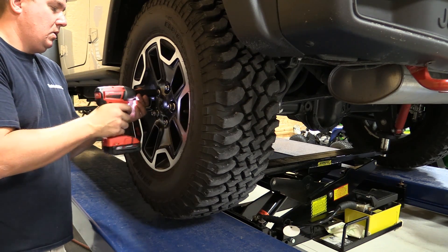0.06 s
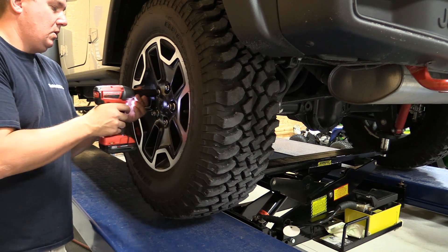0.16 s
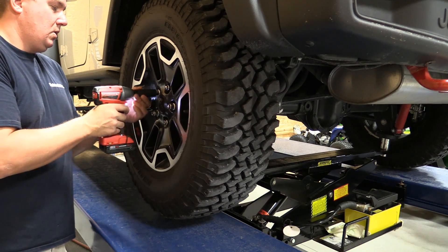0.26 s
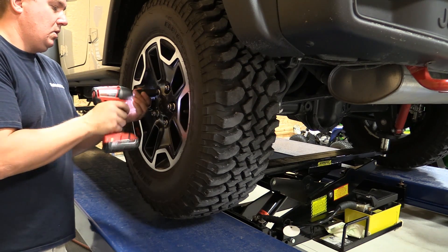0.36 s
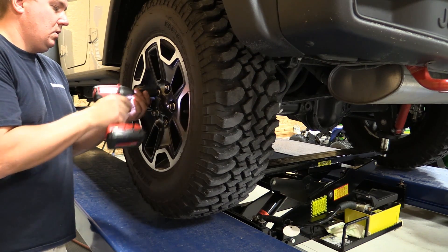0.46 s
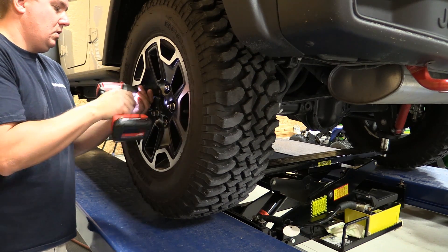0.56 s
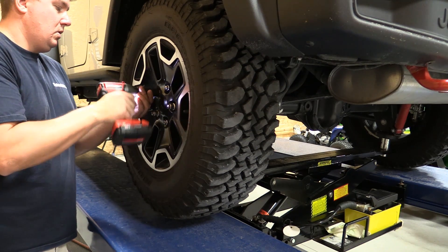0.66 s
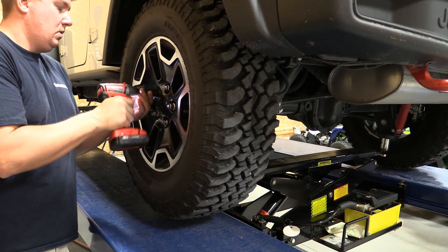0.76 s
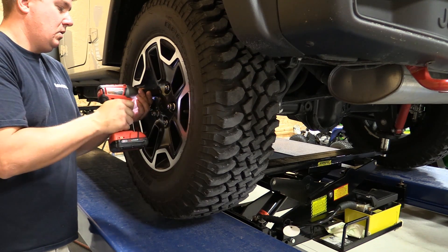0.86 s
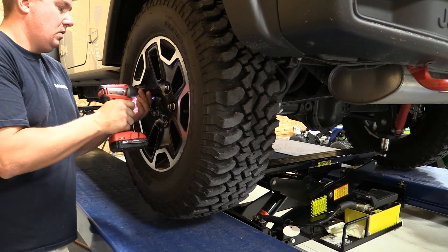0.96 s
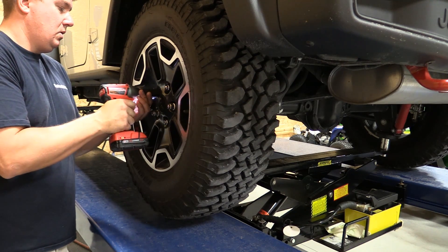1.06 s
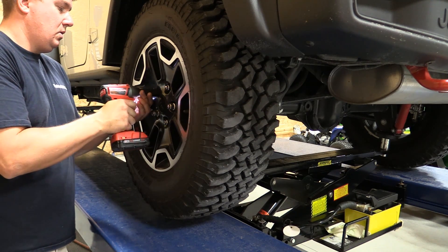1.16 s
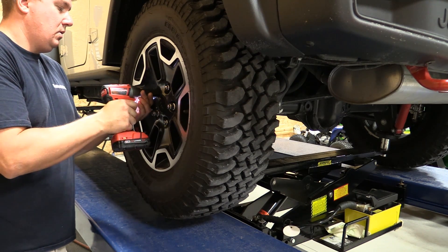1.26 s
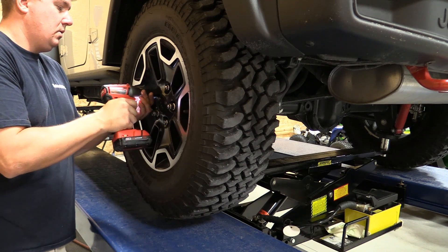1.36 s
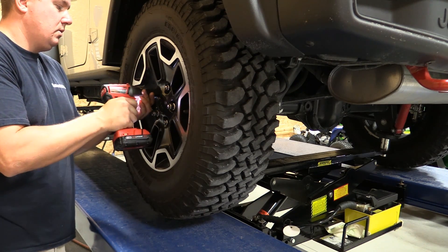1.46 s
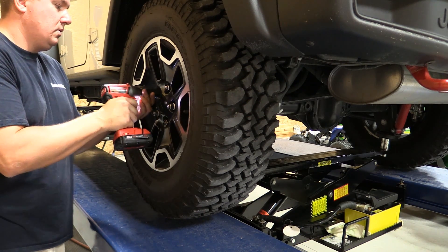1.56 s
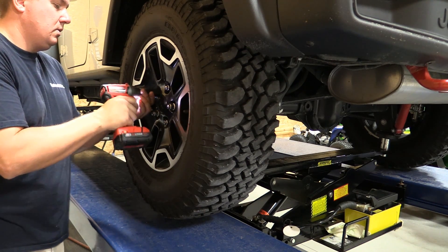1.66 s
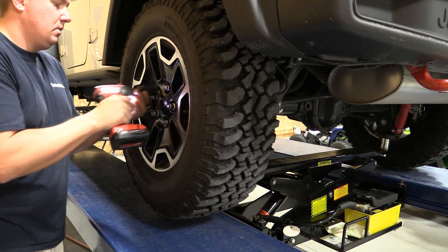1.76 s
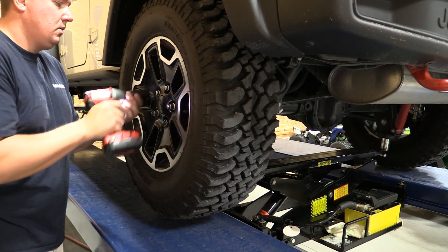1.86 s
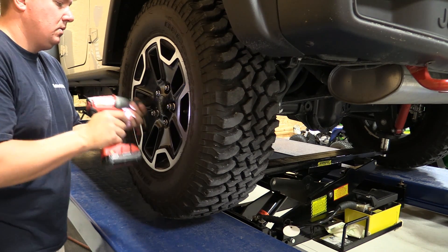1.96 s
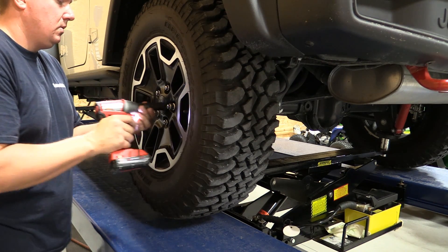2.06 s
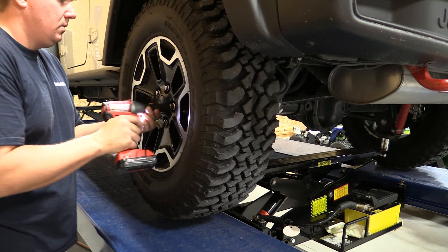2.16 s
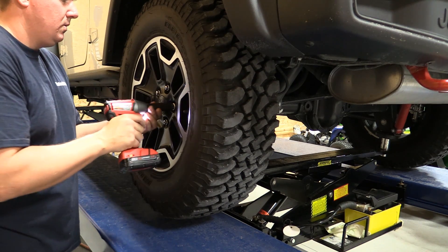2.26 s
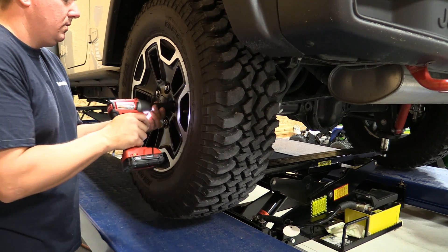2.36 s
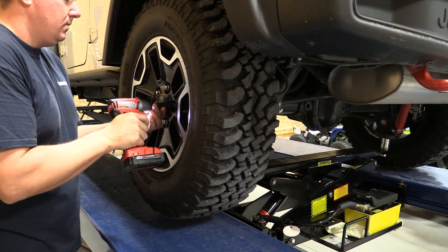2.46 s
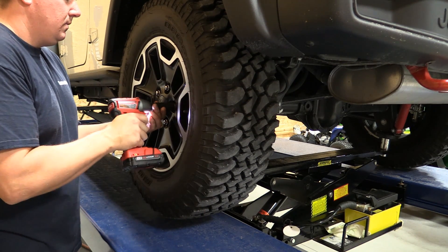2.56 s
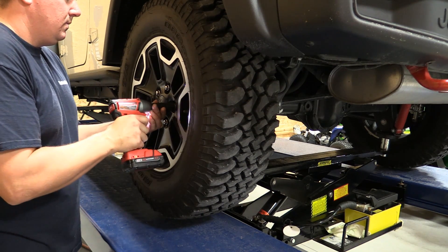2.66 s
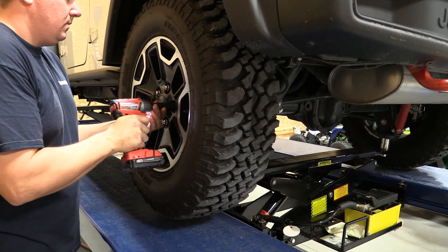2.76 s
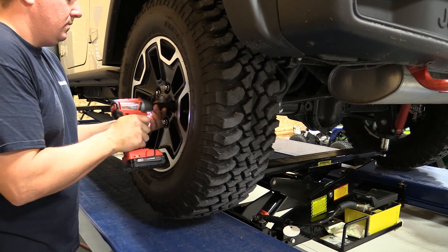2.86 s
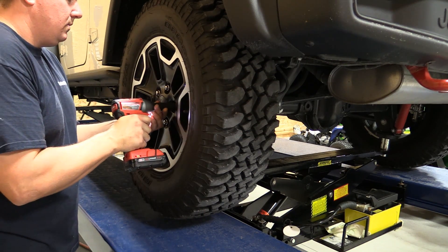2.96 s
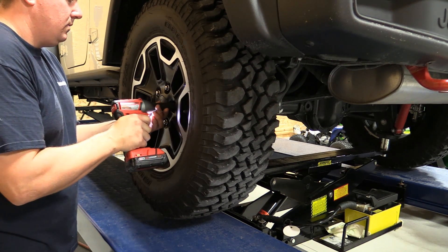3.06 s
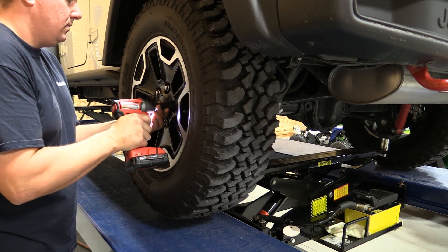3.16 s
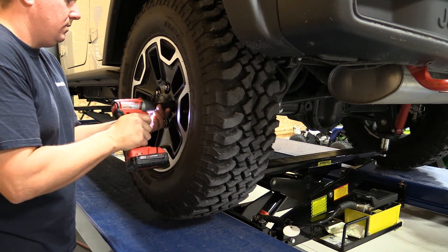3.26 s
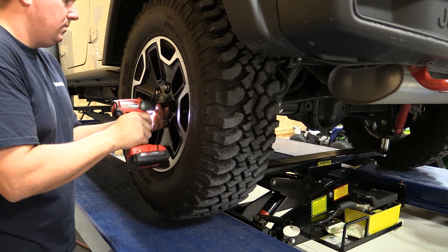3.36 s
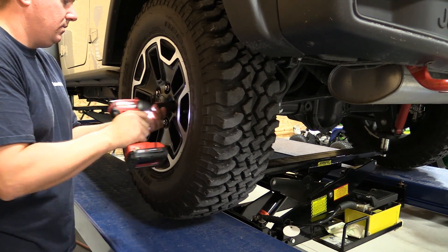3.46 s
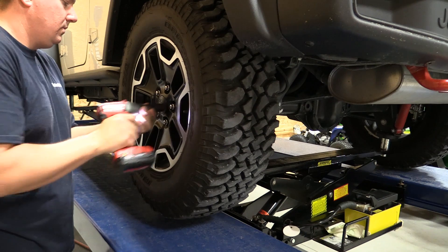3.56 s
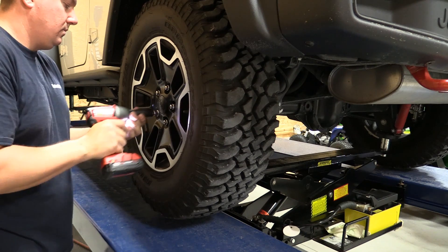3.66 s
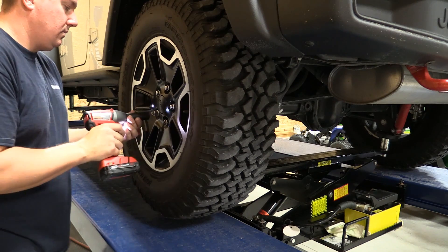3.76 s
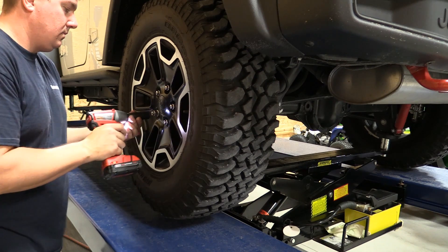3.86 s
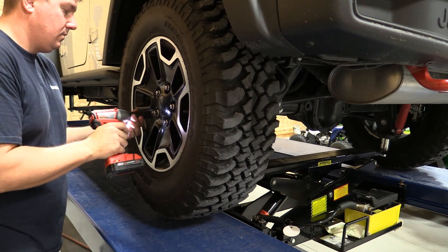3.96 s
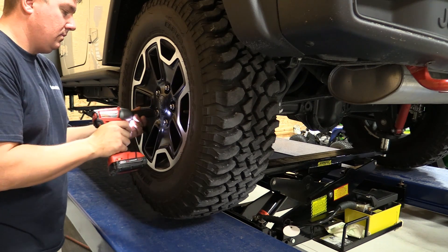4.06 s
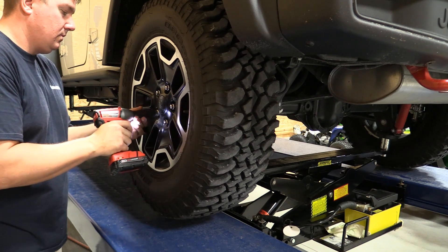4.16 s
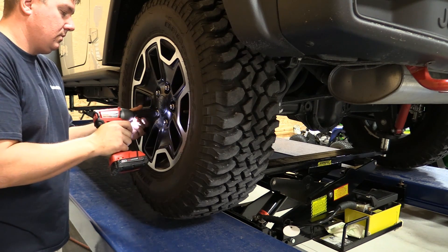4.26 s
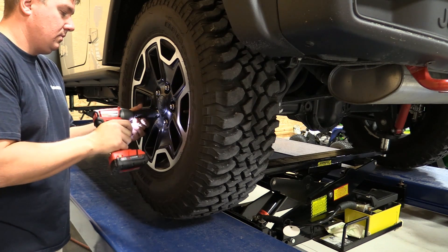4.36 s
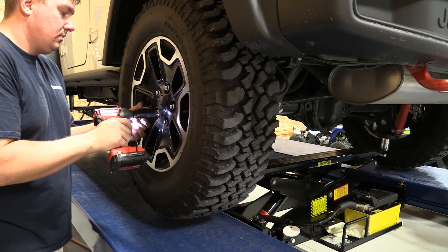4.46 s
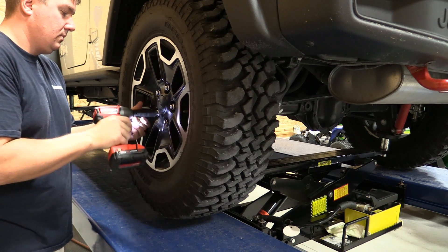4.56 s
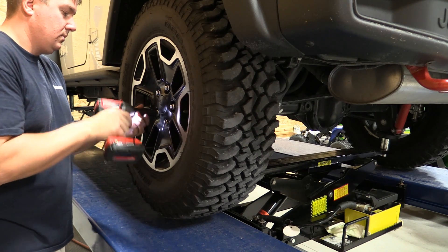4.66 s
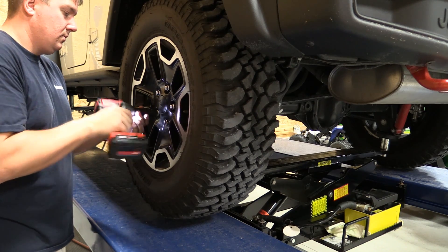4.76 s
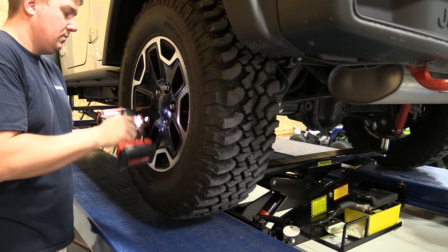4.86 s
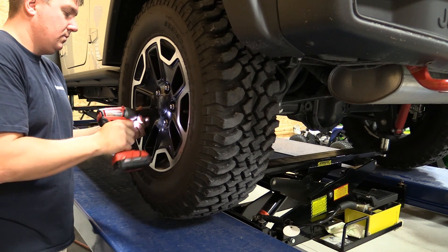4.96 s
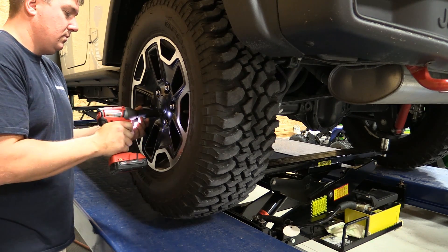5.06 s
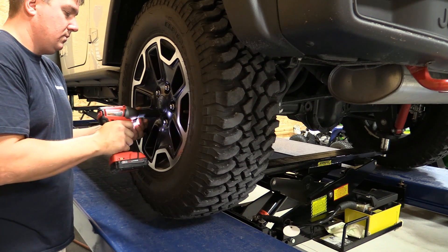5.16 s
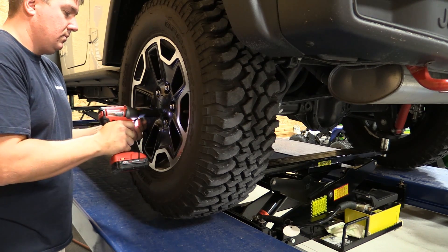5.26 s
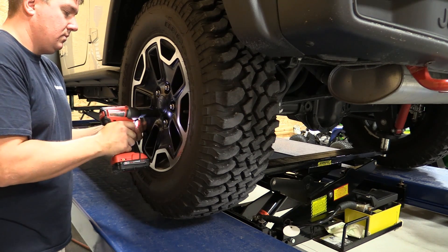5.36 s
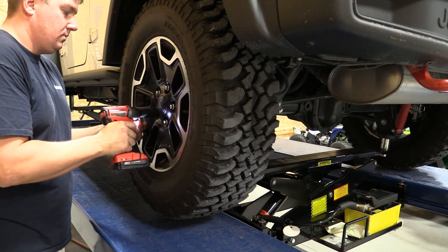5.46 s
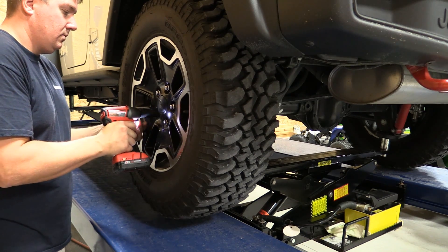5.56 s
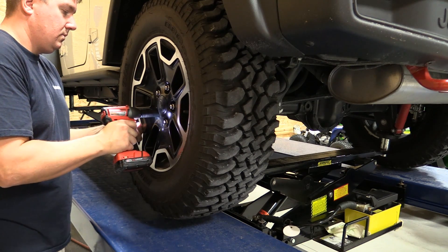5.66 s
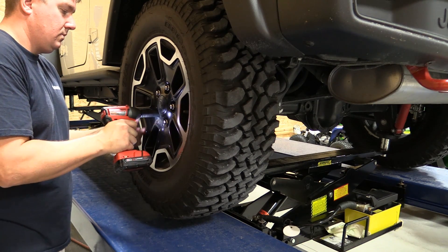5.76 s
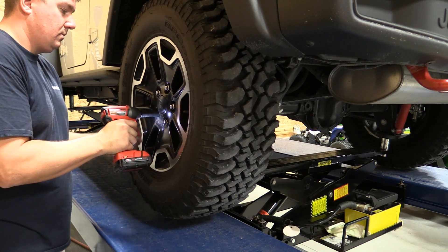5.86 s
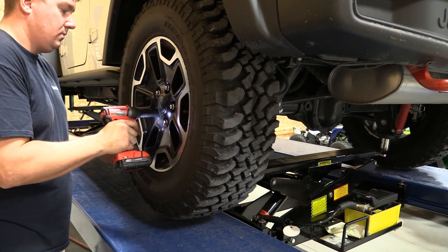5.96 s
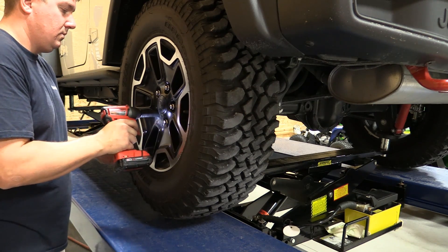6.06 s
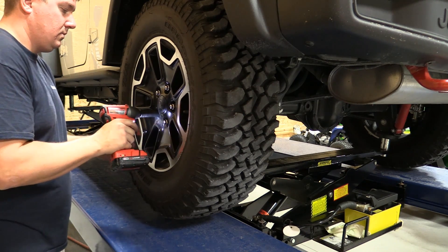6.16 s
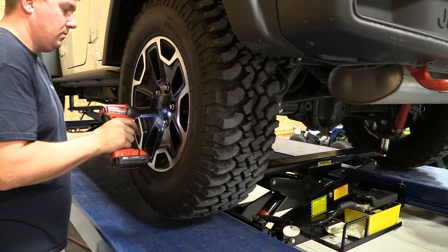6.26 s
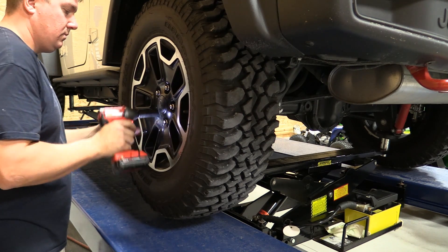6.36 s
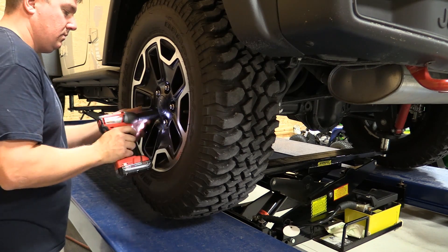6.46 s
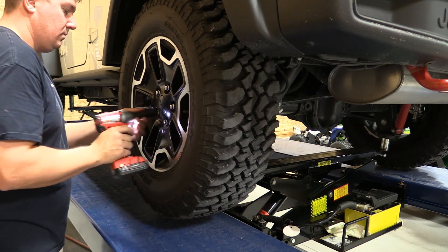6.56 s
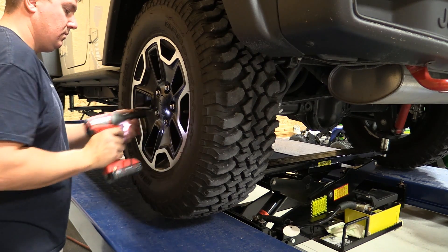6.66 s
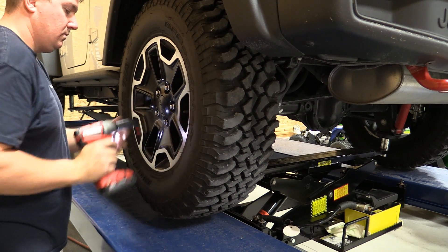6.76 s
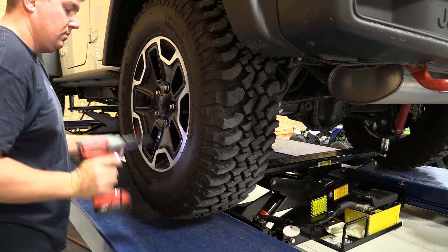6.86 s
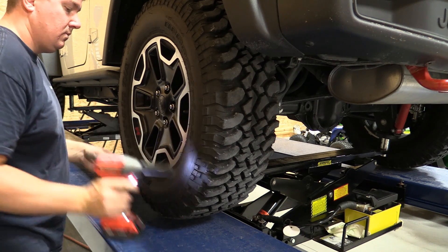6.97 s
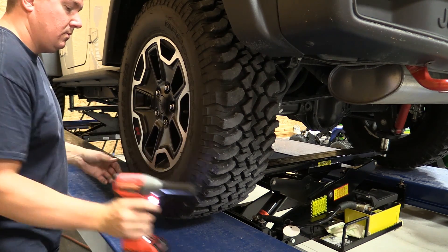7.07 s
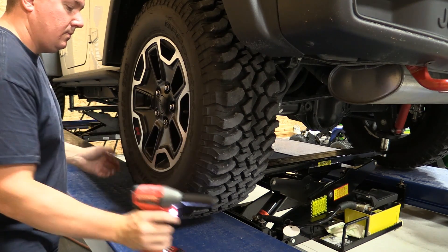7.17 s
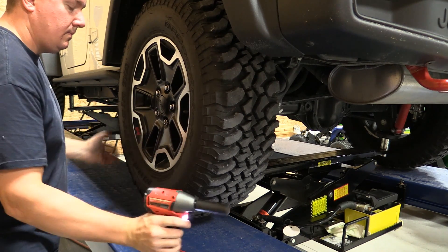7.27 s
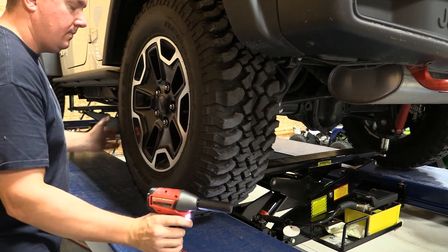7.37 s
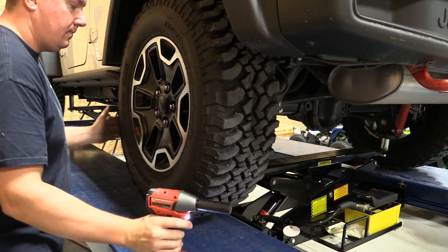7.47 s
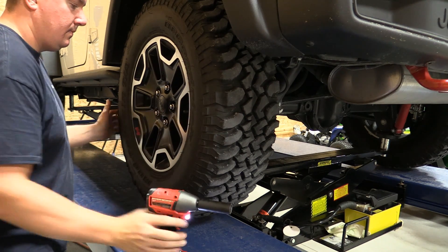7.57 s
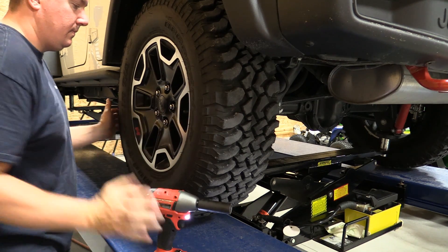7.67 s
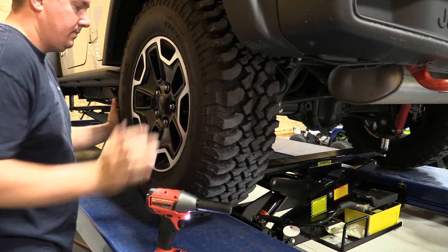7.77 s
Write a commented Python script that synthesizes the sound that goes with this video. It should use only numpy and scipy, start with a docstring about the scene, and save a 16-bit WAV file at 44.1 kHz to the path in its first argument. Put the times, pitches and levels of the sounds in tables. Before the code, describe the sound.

In a large, echoing garage, a cordless impact wrench tightens three lug nuts on a wheel. Each time the gears whirr and the loose socket rattles, then the tool breaks into a short, loud burst of rapid hammering. The socket clinks from nut to nut in the pauses. Finally the tool is set down on a steel lift with a clack and a soft boom, over a faint machinery hum.

```python
"""A large, echoing garage: a cordless impact wrench runs three lug nuts onto an alloy wheel.
On each nut the gears whirr and the socket rattles until it seats; then the hammer strikes about
40 times a second. The socket clinks from nut to nut; last, the tool lands on the booming steel lift.
Air, machinery hum and handling rub lie underneath. Gain control ducks the loud parts."""
import sys
import numpy as np
from scipy import signal
from scipy.io import wavfile

SR = 44100
rng = np.random.default_rng(int(sys.argv[2]) if len(sys.argv) > 2 else 0)


def pcm_store(signal):
    """Save signal as 16-bit PCM."""
    levels = np.round(np.clip(np.atleast_2d(signal), -1, 1) * 32767)
    wavfile.write(sys.argv[1], SR, levels.astype(np.int16).T)


N = 345303
TIME_S = np.arange(N) / SR
BLOW_RATE_HZ = 40.26  # two blows per hammer turn
TOUCH_LEAD_S = .006  # nut meets wheel this long before the first blow

# Noise spectra. Each row: frequency in Hz, relative density in dB.
AIR_SPECTRUM = [(25, 0), (45, 10.5), (100, 5.5), (200, -9.5), (350, 0.5), (550, -4), (1000, -20.5),
                (2000, -17.5), (4000, -22.5), (6500, -27.5), (9000, -28), (10700, -22), (12000, -29.5),
                (15500, -36.5)]
OLD_ECHO_SPECTRUM = [(100, -6), (550, 4.5), (850, -1.5), (1500, -3.5), (2800, 2.5), (4700, 0.5), (5300, -9),
                     (6200, -16), (12000, -28)]
GEAR_SPECTRUM = [(50, -27), (200, -1), (400, -4), (600, -2.5), (1500, 1.5), (1900, -2.5), (3400, 3.5),
                 (4600, -0.5), (7400, -10), (9000, -8.5), (11300, -26), (14000, -27), (15000, -34.5)]
SOCKET_SPECTRUM = [(60, -6.5), (230, 2), (450, -3), (900, -0.5), (1900, -2), (3200, 3), (5200, -3.5),
                   (6500, -11.5), (8500, -14.5), (11000, -28), (15500, -31)]
ANVIL_SPECTRUM = [(50, -37), (160, -28), (270, -15), (410, -14), (1000, -12), (1750, -10.5), (2300, -6),
                  (3300, 4), (4500, -2.5), (6500, -7.5), (8600, -12), (10200, -22.5), (12500, -25),
                  (14100, -24.5), (15200, -32.5)]
RUB_SPECTRUM = [(40, -16.5), (110, -5.5), (190, -2.5), (350, -11.5), (700, -21.5), (3000, -48),
                (10000, -48)]
TAIL_SPECTRUM = [(100, -15), (500, 2.5), (1500, -1.5), (3500, -2), (8000, -2.5), (14000, 10)]
BATTERY_SPECTRUM = [(60, -16), (300, 8), (800, -2.5), (1400, 1.5), (2000, -1), (4200, -1.5),
                    (6000, -11), (9500, -14.5), (12500, -34), (15500, -34)]
SHUDDER_SPECTRUM = [(25, -13), (70, 5), (300, -3), (600, -16), (1500, -35), (5000, -47)]
# Modes of lift deck, socket with rim, and wheel body. Each row: frequency in Hz, level in dB,
# T60 in seconds.
DECK_MODES = [(67.8, 10, 0.54), (73, -3, 0.87), (93.5, 6, 0.483), (136.2, -3, 1), (186, -15, 0.8),
              (258, -1, 0.69), (275, -20, .9), (336, -1, 1), (418, -10, 1), (514, -6, 0.34), (576, -10, .6),
              (660, -12, 0.72)]
RIM_MODES = [(290, -8, .2), (555, -8, .25), (1240, -3, .11), (1390, -9, .12), (2050, -7, .08),
             (2550, 1, .09), (3500, -4, .05), (4450, -2, .11), (4660, 0, .06), (5220, 2, .04),
             (7200, -10, .03), (8500, -10, .025), (15250, -24, .04)]
WHEEL_MODES = [(245, -41.5, 0.12), (275, -34.5, .032), (319.7, -48, 0.32), (555, -57.5, .6)]
# Shop machinery. Each row: frequency in Hz, level in dB, width in Hz.
HUM_TONES = [(80, -57.5, 10), (104.2, -62, 20), (114.6, -53.5, 7.4)]
# Arms shift the tool. Each row: middle in seconds, length in seconds, level in dB.
ARM_MOVES = [(0.553, 0.79, -53), (2.4, 0.35, -48.5), (4.25, .5, -53.5), (4.958, 0.42, -49.5),
             (6.896, 0.63, -70), (7.7, .7, -59)]
# Hall decay. Each row: frequency in Hz, T60 in seconds.
HALL_T60 = [(100, 0.29), (400, 2.1), (1000, 2.38), (3000, 1.97), (5000, 1.72), (8000, 1.23), (14000, 0.58)]
# Tool lands on the lift and rocks. Each row: start in seconds, clack in dB, boom in dB.
TOOL_LANDINGS = [(7.298, -19.5, -34.5), (7.322, -25, -43), (7.395, -27.5, -41)]
# Socket pulled off and pushed on. Each row: start in seconds, scrape level in dB, tilt in dB per octave,
# scrape decay in seconds, rim ring in dB.
SOCKET_CLINKS = [(0.251, -36, -5.5, .003, -43), (0.385, -30, -11, .003, -41), (0.458, -35, -8, 0.0094, -38),
                 (.553, -34, -4.5, 0.012, -36), (0.615, -31.5, -6.5, 0.037, -43.5),
                 (0.655, -31.5, 0, .004, -38), (.753, -38.5, -3.5, .003, -46.5),
                 (.837, -27, -1, 0.0014, -42.5), (2.257, -18.5, -2.5, 0.0034, -44),
                 (2.318, -26, -2.5, 0.0066, -30), (2.444, -36.5, -0.5, 0.004, -29),
                 (2.625, -28.5, -0.5, 0.0024, -38.5), (4.141, -24.5, 1.5, .006, -12),
                 (4.195, -16, -1.5, 0.0084, -19), (4.473, -38.5, -0.5, .005, -37.5),
                 (4.683, -25, -1, 0.00078, -24), (4.704, -26, 2, .012, -30),
                 (4.786, -34.5, 2.5, .002, -39.5), (4.86, -32.5, -1.5, 0.0036, -31.5),
                 (4.904, -16.5, -2.5, 0.0055, -22.5), (5.082, -29.5, -2, 0.0026, -35.5),
                 (6.82, -27, -1, 0.0013, -47)]
# Hard knocks of the loose socket. Each row: start in seconds, level in dB.
SOCKET_KNOCKS = [(0.909, -18), (0.9191, 0.6), (0.9235, -2), (0.938, -6), (1.0457, -11), (1.2011, -8.5),
                 (1.2377, -10), (1.3245, -10.5), (1.754, -11), (2.6871, -19), (2.698, 0), (2.707, -6),
                 (2.7163, -4.5), (2.895, -9.5), (2.9857, -9), (3.0283, -8.5), (3.0427, -4), (3.4945, -8),
                 (3.5084, -15), (5.1486, -12.5), (5.4975, -16), (6.031, -10.5)]
# Timing per nut. Each row: trigger pull, seating and trigger release, all in seconds.
NUT_RUNS = [(.86, 1.396, 1.755), (2.655, 3.104, 3.47), (5.11, 5.649, 6.015)]
# Drive per nut. Each row: free speed in Hz, spin-up in seconds, gear level in dB, run-down swell in dB,
# gear level while hammering in dB.
NUT_DRIVES = [(38.16, 0.025, -27.5, 6, -28), (37.77, .023, -30.5, 9, -33.5),
              (38.65, .034, -25, -1.5, -35.5)]
# Tool-to-wheel coupling per nut. Each row: blow level in dB, blow fade in dB per second, mesh in dB,
# whine in dB, rumble in dB, seating ring in Hz.
NUT_COUPLINGS = [(-6.5, 3, -16, -2.5, -16, 2200), (-2.5, 19, -15, -4.5, -16.5, 1800),
                 (-8.5, 5, -8, -5.5, -13.5, 2150)]
# Gear mesh. Each row: multiple of drive speed, level in dB.
MESH_ORDERS = [(36, -7), (38, -11), (42, 0)]
# Wheel shake. Each row: multiple of drive speed, level in dB, width in Hz.
RUMBLE_ORDERS = [(2, -3, 10), (3, -15, 20), (4.701, 2, 66), (6, -1.5, 30)]


def gain_of(db):
    """Decibels to amplitude."""
    return 10 ** (np.asarray(db) / 20)


def unit_rms(x):
    """Scales to rms 1."""
    return x / np.sqrt(np.mean(x ** 2) + 1e-20)


def log_interp(table, hz):
    """Reads a table on a log-frequency axis."""
    table_hz, values = np.transpose(table)
    return np.interp(np.log(hz + 1), np.log(table_hz + 1), values)


def add(mix, start_s, sound):
    """Mixes a sound in at start_s."""
    part = mix[round(start_s * SR):][:len(sound)]
    part += sound[:len(part)]


def coloured(x, spectrum, tilt_db_oct=0, size=2048):
    """Minimum-phase filter of unit energy; the tilt sets in around 500 Hz."""
    hz = abs(np.fft.fftfreq(size, 1 / SR))
    log_gain = np.log(gain_of(log_interp(spectrum, hz) + tilt_db_oct * np.log2(1 + hz / 500)))
    impulse = np.fft.ifft(np.exp(np.conj(signal.hilbert(log_gain)))).real
    return signal.oaconvolve(x, impulse / np.linalg.norm(impulse))[:len(x)]


def fuzzy_tone(hz, width_hz, steadiness=.26):
    """Tone along the curve hz, wandering in phase and, less so, in strength."""
    offset_hz = np.fft.fftfreq(2 ** int(np.ceil(np.log2(len(hz)))), 1 / SR)
    phasors = np.exp(2j * np.pi * rng.random(len(offset_hz)))
    wander = np.fft.ifft(phasors / (1 + (2 * offset_hz / width_hz) ** 2))[:len(hz)]
    carrier = np.exp(2j * np.pi * np.cumsum(hz) / SR)
    return unit_rms((wander / abs(wander) ** steadiness * carrier).real)


def ringing(modes, spread_db):
    """One second of decaying modes; each contact shares its energy out differently."""
    t = np.arange(SR) / SR
    out = np.zeros(SR)
    for hz, db, t60_s in modes:
        envelope = gain_of(db + spread_db * rng.standard_normal() - 60 * t / t60_s)
        out += envelope * np.sin(2 * np.pi * hz * t) * rng.choice([-1, 1])
    return out


def strike(spectrum, tilt_db_oct, chatter, chatter_s, scatter, scatter_s, rise_s=.0011, size=4096):
    """Brief contact chatter plus scatter from the wheel well: two decaying noise bursts."""
    t = np.arange(size) / SR
    rise = 1 - np.exp(-t / rise_s)
    burst = lambda decay_s: unit_rms(rng.choice([-1, 1], size) * np.exp(-t / decay_s) * rise)
    force = chatter * burst(chatter_s) + scatter * burst(scatter_s)
    return unit_rms(coloured(force, spectrum, tilt_db_oct)) * np.sqrt(20 / size)


def shop_background(air_db=-60, rub_db=-64):
    """Still air, machinery hum and a dull handling rub that swells with each arm move."""
    air = gain_of(air_db) * coloured(rng.standard_normal(N), AIR_SPECTRUM)
    hum = sum(gain_of(db) * fuzzy_tone(np.full(N, hz), width_hz) for hz, db, width_hz in HUM_TONES)
    rub = coloured(rng.standard_normal(N), RUB_SPECTRUM)
    swells = sum(gain_of(db) * np.cos(np.pi * np.clip((TIME_S - middle_s) / length_s, -.5, .5))
                 for middle_s, length_s, db in ARM_MOVES)
    return air + hum + rub * np.hypot(gain_of(rub_db), swells)


def old_echo(level_db=-53, t60_s=1.3):
    """The hall still rings from an earlier nut: fading noise."""
    return gain_of(level_db - 60 * TIME_S / t60_s) * coloured(rng.standard_normal(N), OLD_ECHO_SPECTRUM)


def hall_tail(early_db=8, early_s=.027, gap_s=.0029):
    """Dense echoes, strong at first from vehicle and floor; each band decays at its own rate."""
    hz, t, bands = signal.stft(rng.standard_normal(3 * SR), SR, nperseg=256)
    band_db = log_interp(TAIL_SPECTRUM, hz)[:, None] - 60 * t / log_interp(HALL_T60, hz)[:, None]
    tail = signal.istft(bands * gain_of(band_db), SR, nperseg=256)[1]
    t = np.arange(len(tail)) / SR
    tail *= 1 + gain_of(early_db) * np.exp(-t / early_s)
    tail *= np.clip(t / gap_s - 1, 0, 1)
    return tail / np.linalg.norm(tail)


def hall_reverb(direct, sway_hz=3, tails=3):
    """The worker moves, so echo paths keep changing: several tails crossfade."""
    turns = sway_hz * TIME_S[None] + np.arange(tails)[:, None] / tails
    shares = np.sqrt(2 / tails) * np.cos(np.pi * turns)
    return sum(signal.fftconvolve(direct * share, hall_tail())[:N] for share in shares)


def trigger_whistle(chop_hz=9900, level_db=-62, size=1800):
    """The speed controller whistles briefly while the trigger is half pulled."""
    out = np.zeros(N)
    for pull_s, _, _ in NUT_RUNS:
        whistle = fuzzy_tone(np.full(size, chop_hz), width_hz=120)
        add(out, pull_s, gain_of(level_db) * np.hanning(size) * whistle)
    return out


def set_down(shudder_db=-5, shudder_t60_s=1.83, deck_db=-8):
    """The battery clacks on the lift; the deck booms in its low modes and shudders in the dense ones."""
    out, t = np.zeros(N), np.arange(SR) / SR
    for start_s, clack_db, boom_db in TOOL_LANDINGS:
        clack = strike(BATTERY_SPECTRUM, 0, chatter=.83, chatter_s=.0028, scatter=.41, scatter_s=.013)
        shudder = coloured(rng.standard_normal(SR), SHUDDER_SPECTRUM)
        shudder *= gain_of(shudder_db - 60 * t / shudder_t60_s)
        deck = gain_of(deck_db) * ringing(DECK_MODES, spread_db=1)
        add(out, start_s, gain_of(clack_db) * clack)
        add(out, start_s, gain_of(boom_db) * (deck + shudder))
    return out


def socket_clinks(grip_db_per_s=110):
    """The socket scrapes on a nut; the rim rings, damped by the grip."""
    out, t = np.zeros(N), np.arange(SR) / SR
    for start_s, db, tilt_db_oct, scrape_s, ring_db in SOCKET_CLINKS:
        scrape = strike(SOCKET_SPECTRUM, tilt_db_oct, chatter=1, chatter_s=scrape_s,
                        scatter=.85, scatter_s=2 * scrape_s)
        add(out, start_s, gain_of(db) * scrape)
        add(out, start_s, gain_of(db + ring_db - grip_db_per_s * t) * ringing(RIM_MODES, spread_db=5))
    return out


def drive_motion(t, run, drive, bog_s=.01, coast_s=.081, bite_db=2.5, bite_s=.04, ease_s=.11,
                 spin_db_per_decade=62, coast_db_per_s=260):
    """Drive speed and level: spins up, labours as the nut bites, drops to hammer pace, coasts."""
    pull_s, seat_s, release_s = run
    free_hz, spin_s, gear_db, swell_db, hammering_db = drive
    spin = 1 - np.exp((pull_s - t) / spin_s)
    load = (1 + np.tanh((t - seat_s) / (2 * bog_s))) / 2
    released_s = np.maximum(t - release_s, 0)
    speed_hz = (free_hz * spin * (1 - load) + BLOW_RATE_HZ / 2 * load) * np.exp(-released_s / coast_s)
    progress = np.minimum((t - pull_s) / (seat_s - pull_s), 1)
    running_db = gear_db + swell_db * progress + bite_db * np.exp(-abs(t - seat_s) / bite_s)
    running_db += spin_db_per_decade * np.log10(np.maximum(spin, 1e-3))
    loose = np.exp(-np.maximum(t - seat_s, 0) / ease_s)
    return speed_hz, loose * running_db + (1 - loose) * hammering_db - coast_db_per_s * released_s


def gear_whirr(throb=.083, rasp=.5, sizzle_hz=14150, sizzle_db=-26):
    """Gear teeth clatter; mesh tones, whine, motor sizzle and wheel rumble grow with speed."""
    out = np.zeros(N)
    for run, drive, (_, _, mesh_db, whine_db, rumble_db, _) in zip(NUT_RUNS, NUT_DRIVES, NUT_COUPLINGS):
        t = run[0] + np.arange(SR) / SR
        speed_hz, level_db = drive_motion(t, run, drive)
        angle_rad = 2 * np.pi * np.cumsum(speed_hz) / SR
        teeth = rng.standard_normal(SR) * (rng.random(SR) < .25)
        teeth *= 1 + throb * np.sin(2 * angle_rad)
        tones = gain_of(whine_db) * fuzzy_tone(2 * MESH_ORDERS[-1][0] * speed_hz, width_hz=150)
        tones += gain_of(sizzle_db) * fuzzy_tone(np.full(SR, sizzle_hz), width_hz=1100)
        for order, db in MESH_ORDERS:
            tones += gain_of(mesh_db + db) * fuzzy_tone(order * speed_hz, width_hz=28)
        tones *= 1 + rasp * np.sin(angle_rad)  # gears run slightly off centre
        for order, db, width_hz in RUMBLE_ORDERS:
            tones += gain_of(rumble_db + db) * fuzzy_tone(order * speed_hz, width_hz)
        tones *= (speed_hz / speed_hz.max()) ** 2
        add(out, t[0], gain_of(level_db) * (unit_rms(coloured(teeth, GEAR_SPECTRUM)) + tones))
    return out


def socket_knocks(knock_db=6, thump_db=-3, thump_growth=1.3, rattle_db=-15.5, rattles_per_nut=5):
    """The loose socket slaps and rattles on the nut; the wheel answers hard knocks with a thump."""
    out = np.zeros(N)
    rattles = [(pull_s + (seat_s - pull_s) * np.sqrt(rng.random()), rattle_db + 2 * rng.standard_normal())
               for pull_s, seat_s, _ in NUT_RUNS for _ in range(rattles_per_nut)]
    for start_s, db in SOCKET_KNOCKS + rattles:
        slap = strike(ANVIL_SPECTRUM, 0, chatter=.89, chatter_s=.00059, scatter=.5, scatter_s=.012)
        thump = strike(SOCKET_SPECTRUM, -2.3, chatter=.92, chatter_s=.0044, scatter=.98, scatter_s=.005)
        add(out, start_s, gain_of(db + knock_db) * slap)
        add(out, start_s, gain_of(thump_growth * db + thump_db) * thump)
    return out


def blow_times(seat_s, release_s):
    """Even blows from seating to trigger release."""
    return np.arange(seat_s, release_s, 1 / BLOW_RATE_HZ)


def nut_seating(thud_db=1, ring_db=-12, ring_t60_s=.074, tighten_s=.076):
    """The nut thuds onto the wheel; the socket rings at each blow until the nut is tight."""
    out, t = np.zeros(N), np.arange(SR // 4) / SR
    for (_, seat_s, release_s), (*_, ring_hz) in zip(NUT_RUNS, NUT_COUPLINGS):
        thud = strike(SOCKET_SPECTRUM, -1, chatter=1, chatter_s=.008, scatter=.96, scatter_s=.0057)
        add(out, seat_s - TOUCH_LEAD_S, gain_of(thud_db) * thud)
        ring = gain_of(ring_db - 60 * t / ring_t60_s) * np.sin(2 * np.pi * ring_hz * t)
        for blow_s in blow_times(seat_s, release_s):
            add(out, blow_s, np.exp((seat_s - blow_s) / tighten_s) * ring)
    return out


def hammer(blow_db=9, first_db=8.5, settle_s=.035, uneven_db=1, touch_db=3, slip_db=-13,
           slip_lead_s=.0055, rim_db=-43):
    """Lugs tick over the anvil, then strike, hardest at first; rim and wheel ring under the blows."""
    out = np.zeros(N)
    blow = lambda: strike(ANVIL_SPECTRUM, .4, chatter=.96, chatter_s=.0011, scatter=.57, scatter_s=.0064)
    for (_, seat_s, release_s), (nut_db, fade_db_per_s, *_) in zip(NUT_RUNS, NUT_COUPLINGS):
        wheel = ringing(WHEEL_MODES, spread_db=3.5)
        stud = blow()  # shared part: blows on one stud sound alike
        add(out, seat_s - TOUCH_LEAD_S, gain_of(touch_db) * blow())
        for blow_s in blow_times(seat_s, release_s):
            seated_s = blow_s - seat_s
            tightening_db = first_db * np.exp(-seated_s / settle_s) - fade_db_per_s * seated_s
            gain = gain_of(blow_db + nut_db + tightening_db + uneven_db * rng.standard_normal())
            add(out, blow_s, gain * (stud + blow()) / np.sqrt(2))
            add(out, blow_s, gain * gain_of(rim_db) * ringing(RIM_MODES, spread_db=4))
            add(out, blow_s, gain * wheel)
            tick = strike(ANVIL_SPECTRUM, 0, chatter=.92, chatter_s=.00086, scatter=.48, scatter_s=.004)
            add(out, blow_s - slip_lead_s, gain * gain_of(slip_db) * tick)
    return out


def scene(hall_db=-4):
    """Tool sounds, their reverb and the background, in mono."""
    direct = hammer() + nut_seating() + socket_knocks() + gear_whirr() + trigger_whistle()
    direct += socket_clinks() + set_down()
    return (direct + gain_of(hall_db) * hall_reverb(direct) + old_echo() + shop_background())[None]


def record(dry, threshold_db=-27, duck_db_per_db=.35, recovery_db_per_s=7, attack_s=.0036,
           low_cut_hz=45, ceiling=.76, high_cut_hz=15900):
    """Low cut, gain control that ducks fast and recovers slowly, soft clip, band limit."""
    pole = np.exp(-1 / (attack_s * SR))
    smooth = lambda x: signal.lfilter([1 - pole], [1, -pole], x)
    power_db = 10 * np.log10(smooth(dry[0] ** 2) + 1e-12)
    target_db = duck_db_per_db * np.maximum(power_db - threshold_db, 0)
    recovery_db = TIME_S * recovery_db_per_s
    duck_db = np.maximum.accumulate(target_db + recovery_db) - recovery_db
    low_cut = signal.butter(2, low_cut_hz, "highpass", fs=SR, output="sos")
    ducked = signal.sosfilt(low_cut, dry) / gain_of(smooth(duck_db))
    clipped = ducked / (1 + (ducked / ceiling) ** 6) ** (1 / 6)
    high_cut = signal.firwin(511, high_cut_hz, window=("kaiser", 9), fs=SR)
    return signal.oaconvolve(clipped, high_cut[None], "same")


dry = scene()
out = record(dry)
pcm_store(out)
```